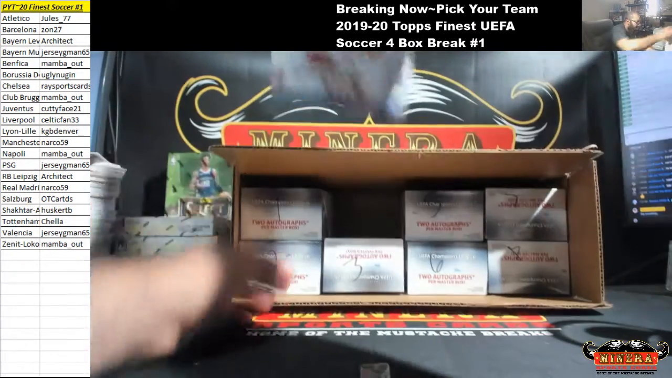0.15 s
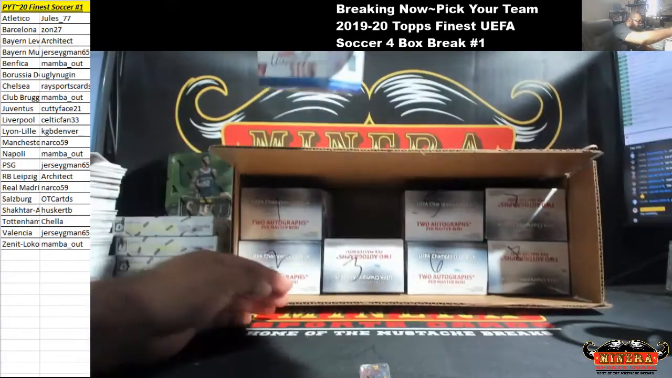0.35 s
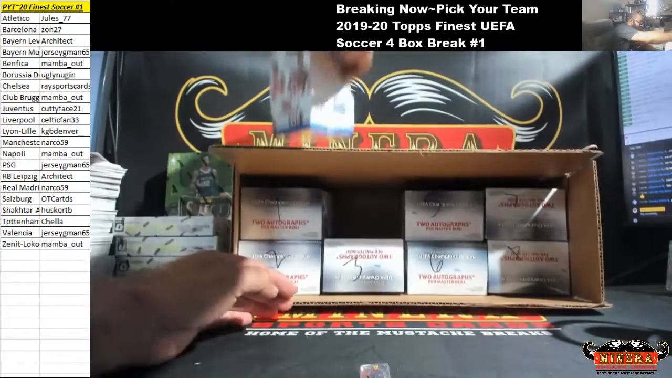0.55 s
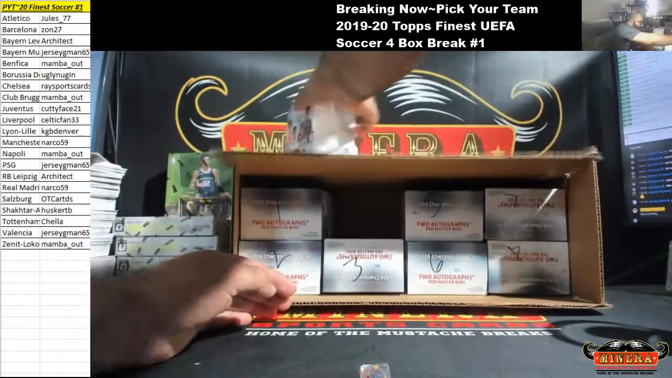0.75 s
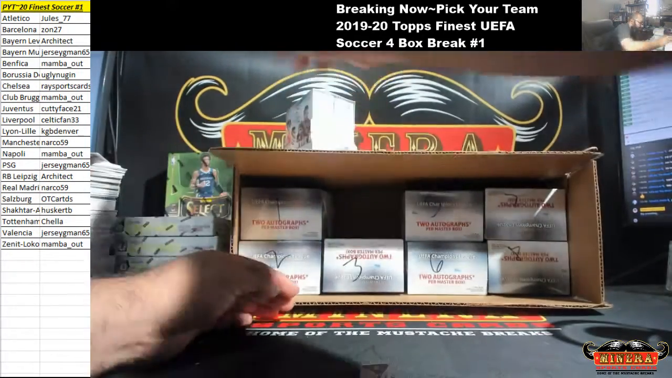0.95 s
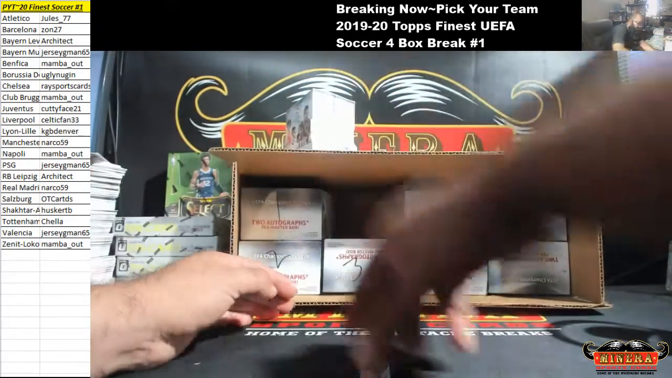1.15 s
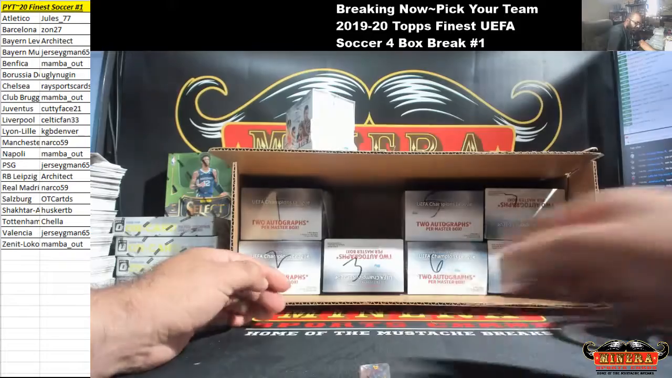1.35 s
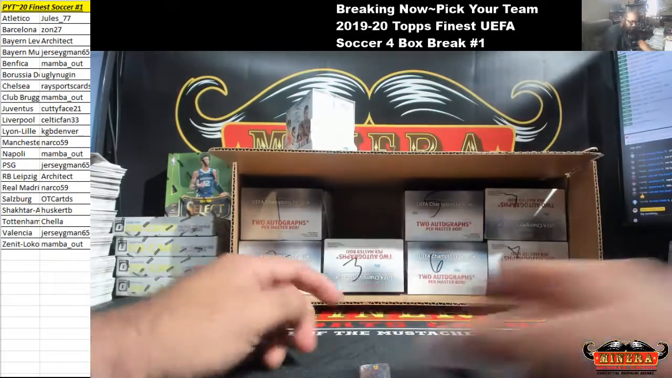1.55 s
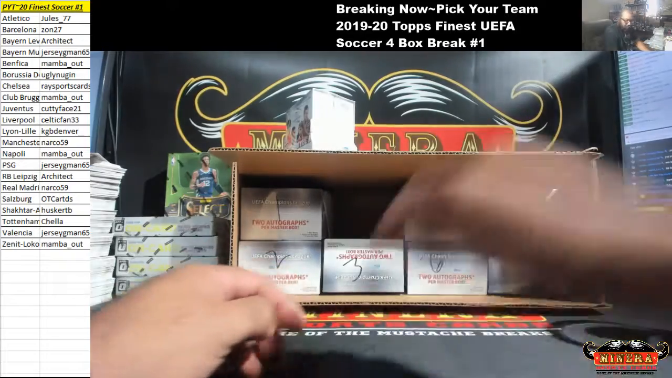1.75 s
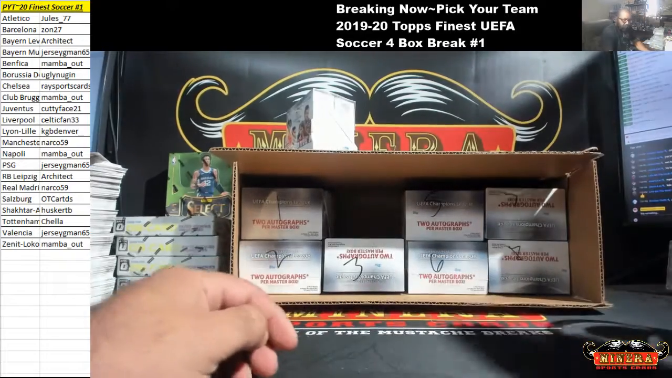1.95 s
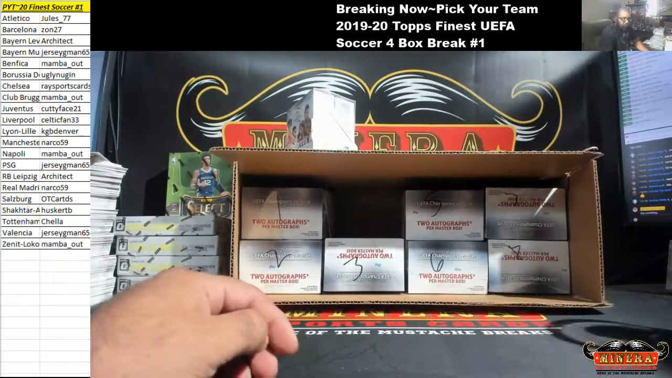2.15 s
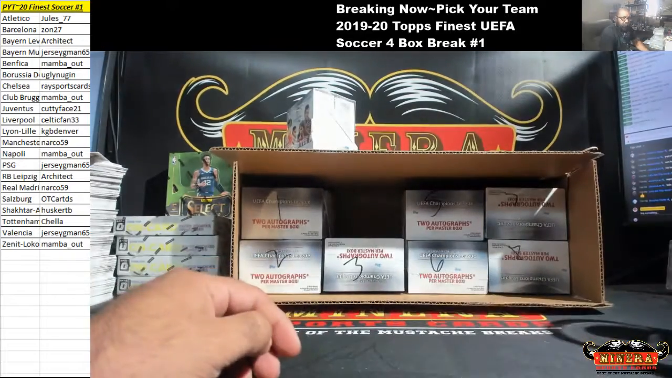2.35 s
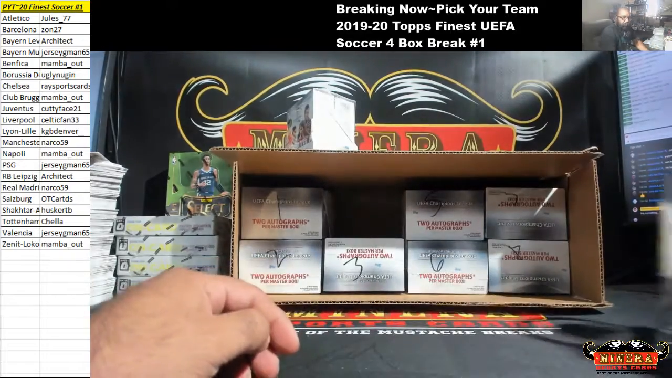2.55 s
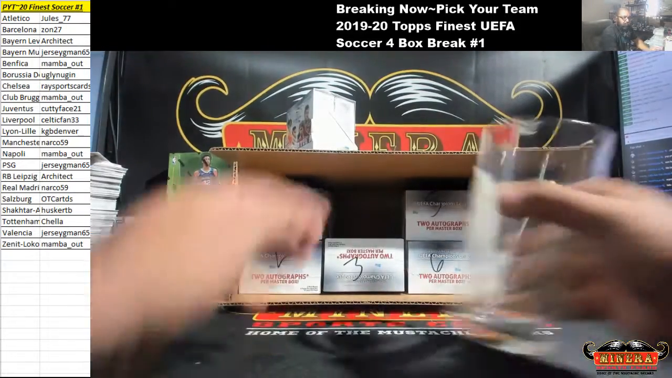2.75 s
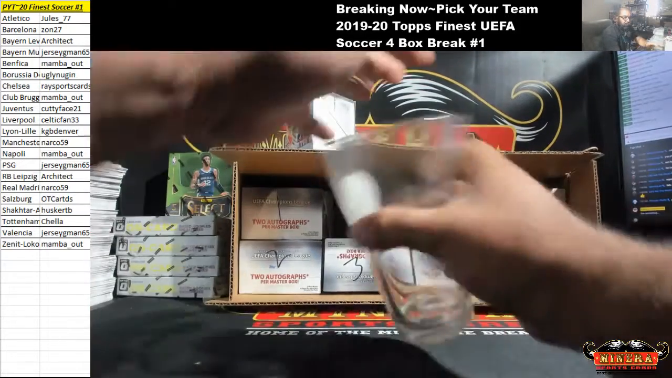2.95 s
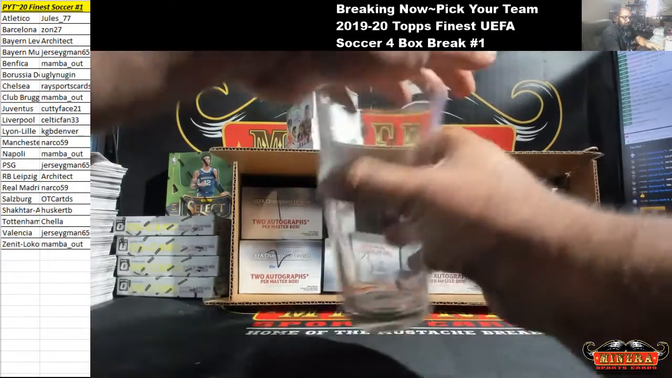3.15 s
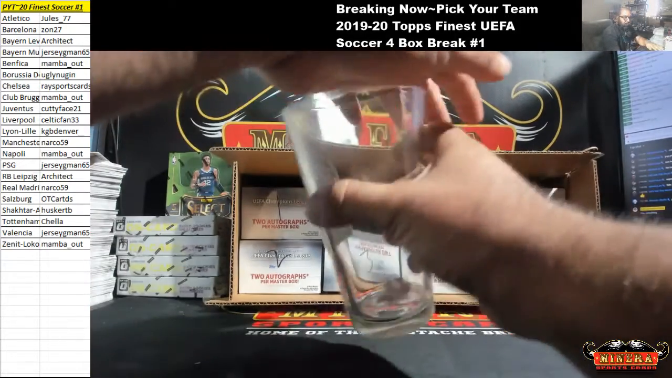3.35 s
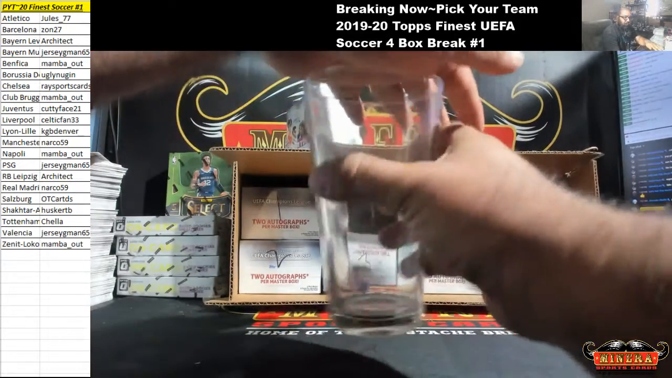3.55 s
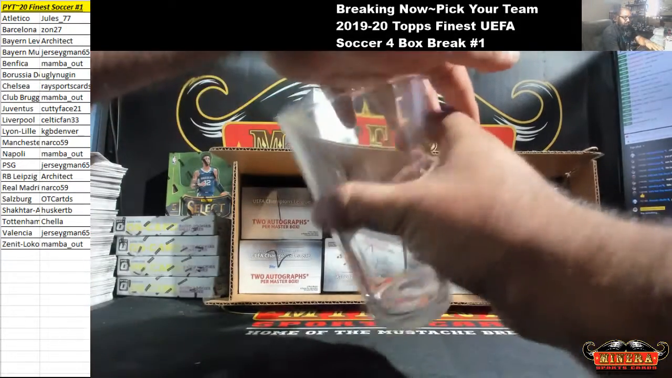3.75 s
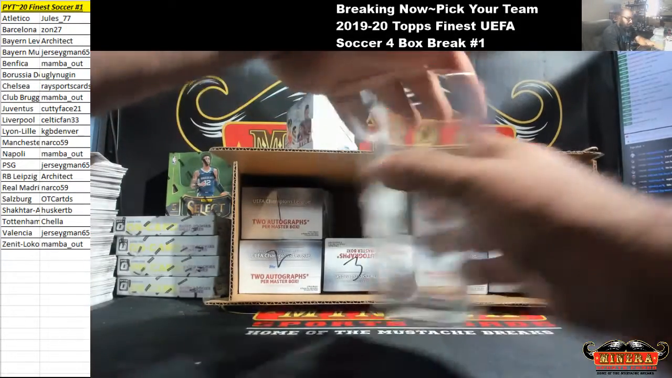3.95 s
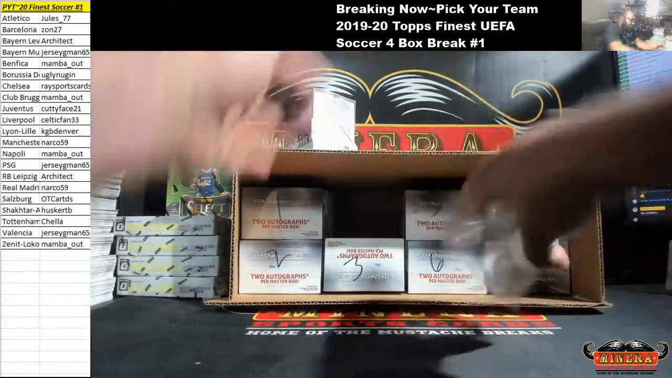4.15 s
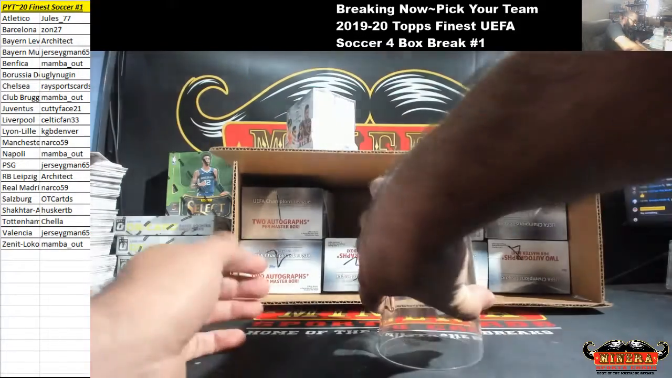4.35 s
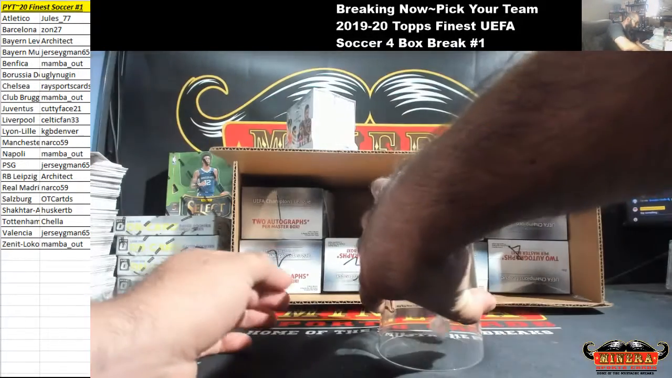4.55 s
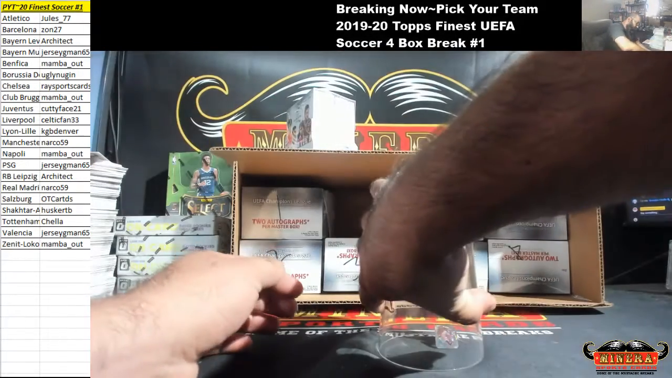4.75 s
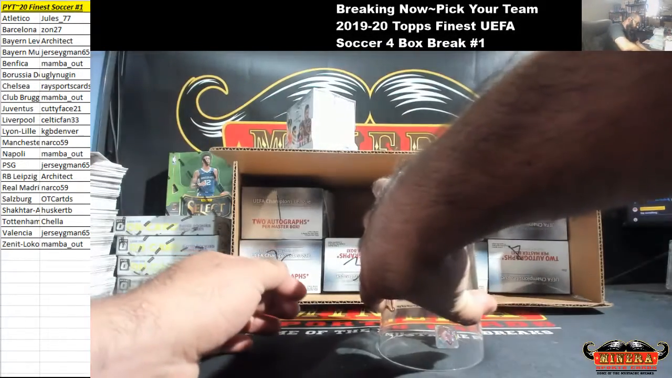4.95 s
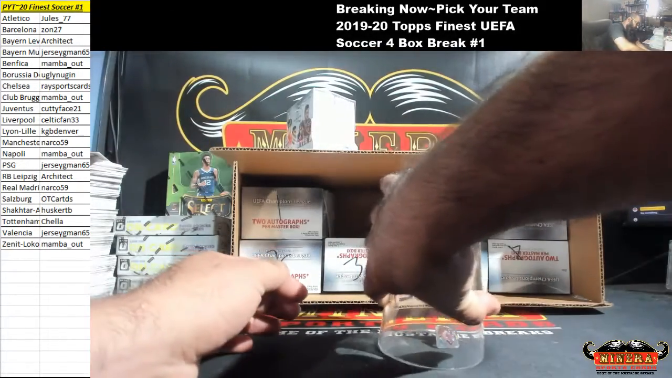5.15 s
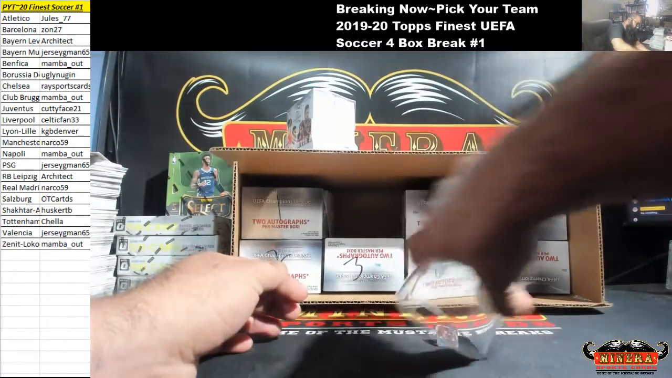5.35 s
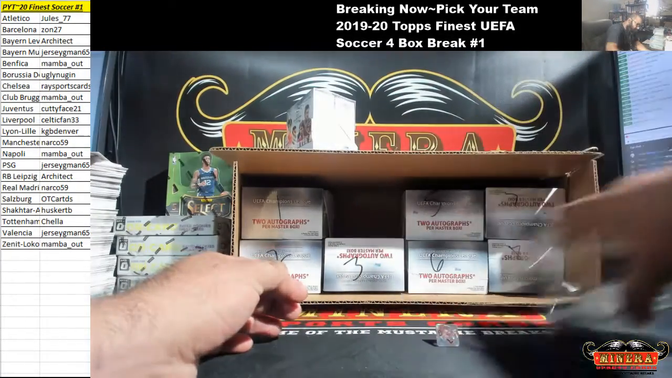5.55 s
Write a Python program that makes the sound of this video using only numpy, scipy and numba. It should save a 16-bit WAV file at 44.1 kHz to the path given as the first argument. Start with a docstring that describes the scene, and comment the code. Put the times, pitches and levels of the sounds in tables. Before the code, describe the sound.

A die rattles rapidly and rings inside a clear tumbler, between dull thumps on a table.

```python
"""Dull knocks sound on a table and a carton is put down with a hoot of squeezed air. After a finger tap, a die
is dropped into a thick clear tumbler, shaken under a covering palm and tipped out onto a mat. Each impact
cracks and excites the tumbler's modes, which the grip damps; flat landings drive its air column. Both landings
on the table shake the microphone stand. Wrapping or a sleeve rustles, a hand slides on the mat, and the small
room hums quietly."""
import sys
import numpy as np
from scipy import signal
from scipy.fft import rfft, irfft, next_fast_len
from scipy.io import wavfile
from scipy.ndimage import uniform_filter1d
from numba import njit

SR = 44100
rng = np.random.default_rng(int(sys.argv[2]) if len(sys.argv) > 2 else 0)


def unload_audio(sound):
    """Save the sound as a 16-bit wav file, at the path given as the first command line argument."""
    columns = np.transpose(np.atleast_2d(sound))
    # keep every value between -1 and 1, then stretch to whole-number steps
    steps = np.round(np.clip(columns, -1, 1) * 32767)
    wavfile.write(sys.argv[1], SR, steps.astype(np.int16))


N = 247643

# Impacts of the die. Each row: start in seconds, base ring level in dB, crack level in dB above it.
DIE_HITS = [(2.0974, -4.5, -16.5), (2.1304, -20, 2.5), (2.1474, -23.5, -1), (2.1974, -24, -5),
            (2.4274, -24, 1), (2.433, -18.5, -6), (2.463, -4.5, -11.5), (2.477, -12.5, -33),
            (2.503, -17, -10), (2.5174, -14, -27), (2.5948, -8.5, -14), (2.6566, -16.5, -19),
            (2.679, -23.5, -7), (2.6939, -14, -24), (2.7327, -8.5, -14.5), (2.7604, -8, -20),
            (2.789, -19.5, -1.5), (2.816, 0, -26), (2.8537, -5, -19.5), (2.8648, -18.5, -6),
            (2.881, -20.5, -5.5), (2.8958, -3, -17), (2.931, -18, -9), (2.9396, -8, -28),
            (2.9715, -2.5, -20), (2.9937, -2.5, -23.5), (3.038, -15.5, -4.5), (3.0505, -12, -10.5),
            (3.0807, -1, -19.5), (3.0914, -3, -34), (3.106, 0.5, -22.5), (3.1333, -14.5, -3.5),
            (3.1622, -7.5, -20), (3.2074, -32, 10), (3.236, -12, -20), (3.2826, -13.5, -46.5),
            (3.322, -4, -20.5), (3.352, -7, -17), (3.368, -25, -2.5), (3.387, -21, -8), (3.4498, 1.5, -18),
            (3.4895, 0, -14), (3.549, -37, -1), (3.572, -2.5, -17), (3.5951, -14, -10), (3.6155, -18.5, -6),
            (3.6247, -29, 3.5), (3.632, -8.5, -9), (3.6504, -11.5, -24), (3.686, -17, -12),
            (3.708, -13, -16.5), (3.7434, -26, 2), (3.762, -6.5, -17.5), (3.8, -24, -29),
            (3.8241, -5.5, -19.5), (3.8467, -5, -24.5), (3.8667, -36, 14), (3.8985, -5, -22),
            (3.9275, -10, -14.5), (3.957, -23, -9), (3.969, -19.5, -7), (3.986, -14, -13.5),
            (4.0247, -26, 8.5), (4.061, -13.5, -26), (4.1232, -7.5, -18), (4.1537, -12, -17),
            (4.1982, -21, -1.5), (4.2481, -14.5, -13), (4.2695, -8.5, -10), (4.2957, -22.5, 11),
            (4.356, -24, 1), (4.4371, -37, 2)]
def die_impacts():
    """Rebounds as a Poisson process: small skips join the hits. Gives times and base, wall, crack dB."""
    hit_s, hit_db, crack_above_db = np.transpose(DIE_HITS)
    first_s, loudest_s, last_s, skips_per_s = 2.43, 2.74, 4.3, 150
    gaps, sizes = -np.log(rng.random((500, 2))).T
    skip_s = first_s + np.cumsum(gaps) / skips_per_s
    skip_db = -34.5 - 11 * abs(skip_s - loudest_s) + np.minimum(4 * sizes, 9)   # a few are large
    skip_s, skip_db = skip_s[skip_s < last_s], skip_db[skip_s < last_s]
    wall_share = 0.56   # dB of wall ring per dB of base ring
    wall_db = np.r_[wall_share * hit_db, wall_share * skip_db - 11]
    crack_db = np.r_[hit_db + crack_above_db, skip_db - 8]
    return np.r_[hit_s, skip_s], np.r_[hit_db, skip_db], wall_db, crack_db


# Short modes that ignore the grip. Each row: frequency in Hz, relative level in dB, T60 in seconds.
BASE_MODES = [(5560, -8, 0.025), (5700, -1, 0.042), (5780, -3, 0.018), (5920, -10, 0.014)]
LIP_MODES = [(10930, -22, .08), (11580, -16, 0.042), (12460, -15, .055), (12640, -20, .04),
             (15800, -29.5, .04)]
# Gripped modes. Each row: frequency in Hz, relative level in dB, T60 in seconds at damping factor 1.
LOW_WALL_MODES = [(2042, -9, 1), (2067.3, 0.5, 0.33)]
HIGH_WALL_MODES = [(4610, -5, .24), (4690, -2, .08)]
RIM_MODES = [(7650, -4, .15), (7860, 1, .3)]
TOP_MODES = [(8570, 0, .2)]
FOOT_MODES = [(3150, -10, .07), (3690, -5, .13), (4240, -4, .08)]
# The grip: dropped into, left ringing, shaken, palm closed, tipped over, landing, rocking, at rest.
# Each row: start in seconds, damping factor, low wall gain in dB, high wall and rim gains in dB above
# that, top gain in dB above the base, foot gain in dB, motion from 0 to 1.
GRIP_STAGES = [(2.09, 1.2, -31.5, -3, -11, -13.5, -29, 0.077),
               (2.19, 0.74, -29.5, 8.5, -19, -15.5, -18, 0.23), (2.42, 2.8, -33, -16, -17, -23, -9.5, 0.94),
               (3.199, 3.1, -31.5, -4, -30, -30.5, -3, 0.51), (4.24, 1.8, -22, -6, -14.5, -16.5, -20, 1),
               (4.29, 3.6, -5, 11, 5.5, 8, -16, 0.68), (4.35, 19.6, -1.5, 6, -9, -31, -8, 1),
               (4.468, 2.3, -14, -2.5, -3, -13, -11.5, 0.23)]
def tumbler():
    """Modal vibration: impacts ring the tumbler, the grip damps it, motion adds a Doppler shift."""
    times, base_db, wall_db, crack_db = die_impacts()
    stage_s, *columns = np.transpose(GRIP_STAGES)
    stage = np.maximum(np.searchsorted(stage_s, np.arange(N) / SR) - 1, 0)
    damping, wall_gain, high_gain, rim_gain, top_gain, foot_gain, motion = (c[stage] for c in columns)
    at = (times * SR).astype(int)
    wall_db = wall_db + wall_gain[at]
    high_db, rim_db = wall_db + high_gain[at], wall_db + rim_gain[at]
    edge_db = 0.38 * base_db + 0.62 * crack_db   # foot and lip mostly follow the crack
    doppler = 1 + 0.0026 * motion * drift(22)
    moving = dict(bend=doppler, flutter_db=3 * motion)
    held = dict(moving, damping=damping)
    out = strike(times, base_db, BASE_MODES, scatter_db=2.5, **moving)
    out += strike(times, wall_db, LOW_WALL_MODES, scatter_db=6, **held)
    out += strike(times, high_db, HIGH_WALL_MODES, scatter_db=4, **held)
    out += strike(times, rim_db, RIM_MODES, scatter_db=2, **held)
    out += strike(times, base_db + top_gain[at], TOP_MODES, scatter_db=3.5, **held)
    out += strike(times, edge_db, LIP_MODES, scatter_db=5, **moving)
    out += strike(times, edge_db + foot_gain[at], FOOT_MODES, scatter_db=4.5, **held)
    linger_t60_s = 0.42   # faint rings of wall, rim and base that the hand does not damp
    for drive_db, hz, db in (high_db, 4620, -32), (rim_db, 7850, -24), (base_db, 5700, -25):
        out += strike(times, drive_db, [(hz, db, linger_t60_s)], scatter_db=1, bend=doppler, flutter_db=6)
    return out + cracks(times, crack_db)


# Contact noise of the die. Each row: frequency in Hz, relative spectral density in dB.
CRACK_SPECTRUM = [(1200, -8.5), (2000, -4.5), (4000, 3.5), (8000, 4.5), (10000, -1.5), (13200, -10.5),
                  (14200, -27.5), (16000, -29)]
def cracks(times, db):
    """Brief contact is broadband: a crack, then a wash of tiny rebounds, coloured anew for each blow."""
    contact, scatter_db = noise(CRACK_SPECTRUM), 3 * rng.standard_normal((len(times), 3))
    below_low, below_high = (signal.sosfilt(signal.butter(2, hz, fs=SR, output="sos"), contact)
                             for hz in (4140, 9600))
    out = 0
    for k, band in enumerate((below_low, below_high - below_low, contact - below_high)):
        blows = clicks(times, from_db(db + scatter_db[:, k]))
        out += band * (fade(blows, t60=0.01) + from_db(-13.5) * fade(blows, t60=0.11))
    return out


# A finger tap, then the die's flat landings, lower in pitch as the palm closes the tumbler.
# Each row: start in seconds, lowest resonance in Hz, level in dB.
AIR_PUSHES = [(1.007, 658, -33.5), (2.131, 660, -29.5), (2.428, 642, -30), (2.882, 665, -31.5),
              (3.207, 552.5, -37.5), (3.366, 597, -37), (3.513, 465, -33.5), (3.629, 527, -39),
              (3.744, 538, -34.5), (3.867, 574, -32.5), (4.199, 662, -28.5)]
# Air column modes. Each row: offset above the lowest in Hz, relative level in dB, T60 in seconds.
AIR_MODES = [(0, 2.5, 0.055), (954, -0.5, 0.042)]
def air_column():
    """Cavity resonance: each push makes the air in the tumbler hoot roughly and die away."""
    out, rise_s = 0, 0.004
    for start, hz, db in AIR_PUSHES:
        age = np.maximum(np.arange(N) / SR - start, 0)
        for offset_hz, mode_db, t60 in AIR_MODES:
            envelope = from_db(db + mode_db - 60 * age / t60) * -np.expm1(-age / rise_s)
            out += envelope * np.sin(2 * np.pi * (hz + offset_hz) * age)
    return out * from_db(2.94 * drift(60))


# Knocks on the table. Each row: start in seconds, relative level in dB, brightness in dB, T60 in seconds.
TABLE_KNOCKS = [(0.001, -12, -7, 0.2), (0.071, -14.5, 0.5, 0.17), (0.651, -7, -15, 0.21),
                (0.68, -13, -6.5, 0.18), (4.217, -25, 6.5, 0.2), (4.299, -21, 2, 0.17),
                (4.447, -29, 15, 0.075)]
# Low modes of the carton, which boom under every knock. Each row: frequency in Hz, relative level in dB, T60 in
# seconds.
BOOM_MODES = [(124.4, 11.5, 0.31), (212.3, 12, 0.15), (246.4, 8.5, 0.082), (354, 10.5, 0.081),
              (424.6, 1.5, 0.13)]
# The dull slap of a knock. Each row: frequency in Hz, relative spectral density in dB.
SLAP_SPECTRUM = [(80, -22), (150, 8), (400, 0), (2000, -19.5), (5000, -30.5), (16000, -51)]
def knocks():
    """Impact excitation: each knock is a burst of dull noise plus a low boom of the carton."""
    times, levels_db, _, _ = np.transpose(TABLE_KNOCKS)
    slap = noise(SLAP_SPECTRUM)
    edge = rms_one(np.diff(slap, prepend=0))   # the hard edge of a knock is its slope
    out = strike(times, levels_db - 23, BOOM_MODES, scatter_db=0)
    for start, db, bright_db, t60 in TABLE_KNOCKS:
        contact = slap * from_db(db - 10) + edge * from_db(db + bright_db - 24.5)
        out += contact * fade(clicks([start], 0.9), t60)
    return out


def carton_puff():
    """Air displacement: air squeezed out under the landing carton gives a short rising hoot."""
    start_s, length_s, from_hz, to_hz = 0.657, 0.062, 180, 428
    progress = np.clip((np.arange(N) / SR - start_s) / length_s, 0, 1)
    hz = from_hz * (to_hz / from_hz) ** np.sqrt(progress)
    return from_db(-17) * np.sin(np.pi * progress) * np.sin(2 * np.pi * np.cumsum(hz) / SR)


# The dry part of the finger tap. Each row: frequency in Hz, relative spectral density in dB.
TAP_SPECTRUM = [(450, 0), (1500, -2), (2700, -4), (3300, -32)]
def finger_tap():
    """A heavily damped impact: a finger on the tumbler gives a light, dry tick."""
    return noise(TAP_SPECTRUM) * fade(clicks([1.008], from_db(-36)), t60=0.035)


# Jolts. Each row: time in seconds, level under 30 Hz in dB, level from 30 to 90 Hz in dB.
TABLE_JOLTS = [(.1, -13.5, -23), (.8, -33.5, -32.5), (3.92, -15.5, -41), (4.42, -11, -33)]
# The upper band of the rumble. Each row: frequency in Hz, relative spectral density in dB.
RUMBLE_SPECTRUM = [(28, 3), (56, 0.5), (66, -2.5), (92, -28.5)]
def stand_rumble():
    """Structure-borne sound: jolts reach the microphone through the table and raise a low rumble."""
    t = np.arange(N) / SR
    rise_db_per_s, deep_fall_db_per_s, low_fall_db_per_s = 92, 49, 14.5
    deep, low = from_db(-32.5), from_db(-41.5)   # resting levels
    for when, deep_db, low_db in TABLE_JOLTS:
        before, after = np.maximum(when - t, 0), np.maximum(t - when, 0)
        deep = deep + from_db(deep_db - rise_db_per_s * before - deep_fall_db_per_s * after)
        low = low + from_db(low_db - rise_db_per_s * before - low_fall_db_per_s * after)
    deep, low = (uniform_filter1d(x, size=round(0.054 * SR)) for x in (deep, low))
    return deep * noise([(3, -4.5), (16, -8.5), (30, -27.5)]) + low * noise(RUMBLE_SPECTRUM)


# Sways of the stand. Each row: start in seconds, frequency in Hz and rms level in dB at the crest.
STAND_SWAYS = [(0.666, 37.3, -5.5), (4.235, 30.93, -3)]
def stand_sway():
    """Damped oscillation: after a landing the stand's sway swells and dies, gliding up in frequency."""
    rise_s, length_s, fall_db_per_s, glide_hz_per_s = 0.047, 0.17, 155, 54
    out = 0
    for start, hz, crest_db in STAND_SWAYS:
        age = np.clip(np.arange(N) / SR - start, 0, length_s)
        swell_db = -10.5 * np.maximum(1 - age / rise_s, 0)
        decay_db = -fall_db_per_s * np.maximum(age - rise_s, 0)
        edges = np.clip(np.minimum(age, length_s - age) / 0.0041, 0, 1)
        phase = 2 * np.pi * age * (hz + glide_hz_per_s * (age / 2 - rise_s))
        out -= np.sqrt(2) * from_db(crest_db + swell_db + decay_db) * edges * np.sin(phase)
    return out


# Rustling strokes: first wrapping or a sleeve rustles, then a hand slides on the mat. Each row: middle in
# seconds, length in seconds, level in dB.
RUSTLE_STROKES = [(1.14, 0.17, -58), (1.547, 0.12, -51.5), (1.778, 0.037, -53.5)]
# Rustling and rubbing on the mat. Each row: frequency in Hz, relative spectral density in dB.
RUB_SPECTRUM = [(1300, 3), (5800, 0.5), (13000, -7), (16000, -36)]
def rustles():
    """Friction noise: each stroke holds its level and fades in and out at its ends."""
    t, edge_db_per_s = np.arange(N) / SR, 101
    envelope = sum(from_db(db - edge_db_per_s * np.maximum(abs(t - middle) - length / 2, 0))
                   for middle, length, db in RUSTLE_STROKES)
    return noise(RUB_SPECTRUM) * envelope


# The hum of the room. Each row: frequency in Hz, relative spectral density in dB.
HUM_SPECTRUM = [(60, -11), (95, 5), (220, -6.5), (420, -13), (935, -9.5), (2230, -24.5), (4000, -36),
                (16000, -44)]
def room_hum():
    """Stationary background noise: a quiet hum, strongest in the bass."""
    return from_db(-50.5) * noise(HUM_SPECTRUM)


def reverberation(x, t60=0.19):
    """Diffuse field: convolution with dulled, exponentially decaying noise gives the room's tail."""
    t = np.arange(SR // 2) / SR
    dull = signal.sosfilt(signal.butter(1, SR / 3, fs=SR, output="sos"), rng.standard_normal(len(t)))
    tail = dull * np.exp(-np.log(1000) * t / t60) * np.clip(t / 0.015, 0, 1)
    return signal.fftconvolve(x, tail / np.sqrt(np.sum(tail ** 2)))[:N]


def strike(times, db, modes, scatter_db, damping=1, bend=1, flutter_db=0):
    """Modal superposition: each blow meets each mode at another point of its shape, so strengths vary."""
    scatter = scatter_db * rng.standard_normal((len(times), len(modes)))
    lobes = drift(72.8)   # a turning body sweeps each mode's lobes past the microphone
    out, build_up_s = 0, 0.0015
    for k, (hz, mode_db, t60) in enumerate(modes):
        blows = clicks(times, from_db(db + mode_db + scatter[:, k]))
        turn = np.full(N, 2 * np.pi * hz / SR) * bend
        loss = np.full(N, np.log(1000) / t60 / SR) * damping
        tone = resonator(blows, turn, loss, 1 / (build_up_s * SR))
        out += tone * from_db(flutter_db * np.roll(lobes, k * N // 9))
    return out


@njit
def resonator(x, turn, loss, rise):
    """A damped oscillator with varying phase step and loss per sample; it builds up at the rate rise."""
    out, state, heard = np.zeros(len(x)), 0j, 0j
    for i in range(len(x)):
        spin = np.exp(1j * turn[i])
        state = state * spin * (1 - loss[i]) + x[i]
        heard = heard * spin * (1 - rise) + rise * state
        out[i] = heard.imag
    return out


def clicks(times, gains):
    """An impulse train, one impulse per event."""
    out = np.full(N, 1e-18)
    np.add.at(out, np.round(np.asarray(times) * SR).astype(int), gains)
    return out


def fade(x, t60):
    """Exponential decay: a unit impulse jumps to 1 and falls 60 dB in t60 seconds."""
    return signal.lfilter([1], [1, -from_db(-60 / (t60 * SR))], x)


def noise(spectrum):
    """Spectral shaping: steady noise of rms 1 that follows (Hz, dB) points."""
    hz, db = np.transpose(spectrum)
    size = next_fast_len(N)
    log_hz = np.log(np.fft.rfftfreq(size, 1 / SR) + 1)
    gain = from_db(np.interp(log_hz, np.log(hz), db, -90, -90))
    return rms_one(irfft(rfft(rng.standard_normal(size)) * gain, size))[:N]


def drift(hz):
    """Random modulation of rms 1 that rolls off above hz."""
    return noise([(hz / 8, 0), (hz, 0), (hz * 4, -24)])


def from_db(db):
    """Decibels as an amplitude ratio."""
    return 10 ** (np.asarray(db) / 20)


def rms_one(x):
    """Normalisation to unit rms."""
    return x / np.sqrt(np.mean(x ** 2) + 1e-20)


def scene():
    """Superposition: the impacts and their reverberation, then stand, rustles and hum, in one channel."""
    struck = tumbler() + air_column() + knocks() + carton_puff() + finger_tap()
    in_room = struck + from_db(-12.5) * reverberation(struck)
    return (in_room + stand_rumble() + stand_sway() + rustles() + room_hum())[None]


def record(dry):
    """Soft saturation rounds the peaks; a steep low-pass filter cuts the top."""
    ceiling, cutoff_hz = 0.92, 16250
    lowpass = signal.cheby2(24, 80, cutoff_hz, fs=SR, output="sos")
    return signal.sosfilt(lowpass, ceiling * np.tanh(dry / ceiling))


dry = scene()
out = record(dry)
unload_audio(out)
```